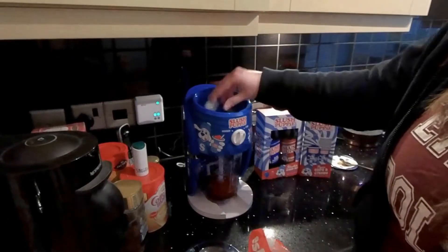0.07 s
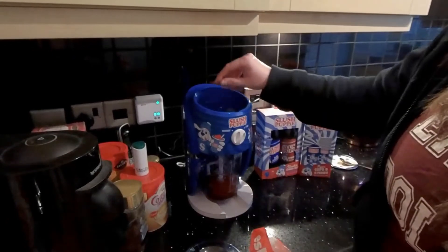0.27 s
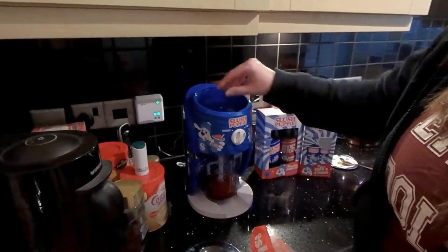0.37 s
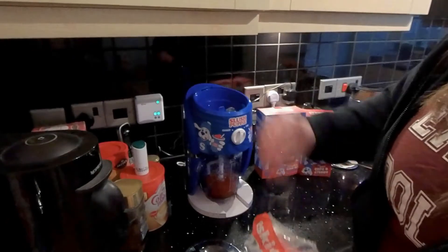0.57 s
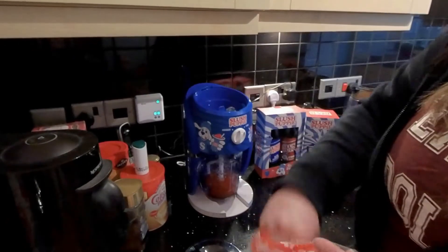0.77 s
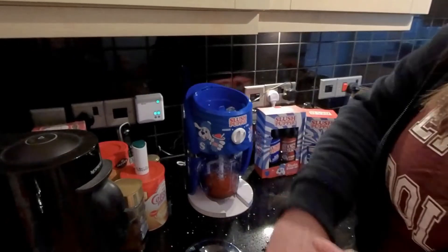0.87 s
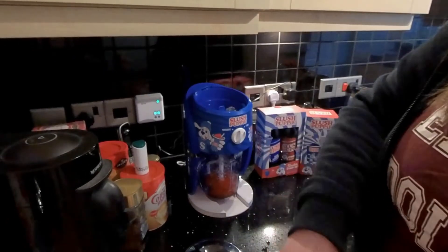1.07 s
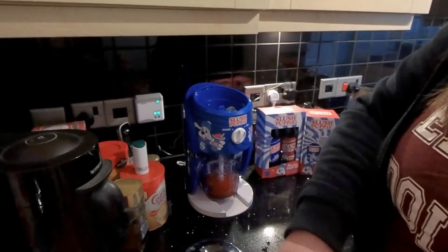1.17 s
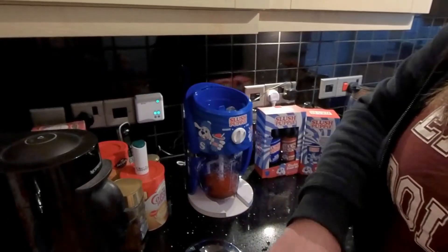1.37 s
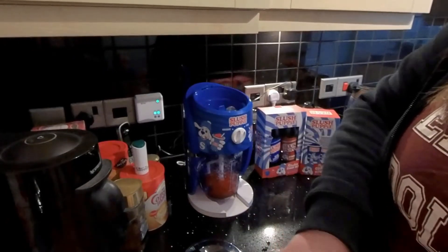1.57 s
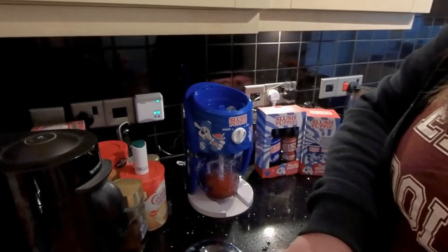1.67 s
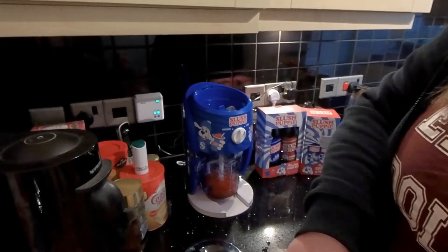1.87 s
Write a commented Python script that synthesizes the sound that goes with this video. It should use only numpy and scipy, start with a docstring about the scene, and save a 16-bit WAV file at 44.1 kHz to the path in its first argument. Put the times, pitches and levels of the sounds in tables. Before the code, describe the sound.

An ice cube drops into a hollow plastic hopper with a loud rattling crack, then after a brief pause a hand rummages in a crackling plastic bag of ice, in a tiled kitchen, stereo microphone nearby.

```python
"""In a tiled kitchen, a microphone pair over a steady noise floor: wet fingers let go of ice in bright ticks.
An ice cube drops into the plastic hopper of an ice shaver: rattling contacts ring its modes and crack.
Two more ticks, then a hand digs in a plastic bag of ice: random grains crackle and rustle, noise bands snap.
The cubes shift and bump the counter, whose low modes ring under soft random pushes; the room answers with
dense, decaying noise."""
import sys
import numpy as np
from scipy import signal
from scipy.fft import rfft, irfft
from scipy.io import wavfile
from scipy.ndimage import uniform_filter1d

SR = 44100
rng = np.random.default_rng(int(sys.argv[2]) if len(sys.argv) > 2 else 0)


def nominal_scale(level):
    """Amplitude ratio for a level in decibels (scalar or array-like)."""
    x = np.asarray(level, float) / 20
    return 10 ** x


def master(y):
    """Save y as 16-bit WAV."""
    cut = np.clip(np.atleast_2d(y).T, -1, 1)
    pcm = np.round(cut * 32767)  # scale
    wavfile.write(sys.argv[1], SR, pcm.astype(np.int16))


N = 83790  # samples

# how hard the bag is handled, relative levels: start_s, crackle_db, rustle_db
HANDLING = [(0.67, -86, -78), (0.704, -61.5, -77), (0.728, -48.5, -85), (0.782, -84.5, -66),
            (0.792, -50.5, -63.5), (0.83, -61, -80), (0.844, -43.5, -48.5), (0.908, -46, -50),
            (0.936, -36.5, -54.5), (0.968, -48.5, -54), (1.016, -34.5, -39.5), (1.032, -40.5, -46),
            (1.23, -43, -52), (1.292, -41, -45.5), (1.358, -49, -64), (1.372, -42, -50.5),
            (1.412, -50, -51), (1.512, -49.5, -56.5), (1.594, -50.5, -50), (1.614, -45, -42.5),
            (1.686, -45, -55), (1.816, -57, -65), (1.864, -39.5, -40), (1.9, -44, -43.5)]
# left over right at the bag: freq_hz, balance_db
BAG_BALANCE = [(60, -3.5), (110, 1), (200, -18.5), (380, -11), (700, -4.5), (1290, -4.0), (2380, -2.5),
               (4400, -0.5), (8120, -1), (15000, -9.5)]
# lag added to the right side at the bag: freq_hz, lag_rad
BAG_LAG = [(0, 0), (340, -0.5), (1120, 0.5), (2240, 0.93), (4130, 2), (4390, 5), (5430, 5), (6370, 8),
           (10600, 7.5), (12100, 8.5), (12500, 5), (14000, 7), (15800, 7.5), (16500, 8.5)]


def rms_one(x):
    """Scales a sound to an rms of 1."""
    return x / np.sqrt(np.mean(x ** 2) + 1e-20)


def at_hz(points, hz):
    """Reads a frequency table along a logarithmic axis."""
    table_hz, value = np.array(points).T
    return np.interp(np.log(np.maximum(hz, 1)), np.log(np.maximum(table_hz, 1e-300)), value)


def band_pass(x, low_hz, high_hz):
    """Keeps one frequency band."""
    return signal.sosfilt(signal.butter(2, [low_hz, high_hz], "band", fs=SR, output="sos"), x)


def colour(x, points, share=1):
    """Causal filter with a share of the given dB curve (minimum phase through the cepstrum)."""
    size = 4096
    curve_db = share * at_hz(points, np.fft.rfftfreq(size, 1 / SR))
    cepstrum = irfft(curve_db * np.log(10) / 20)
    cepstrum[1:size // 2] *= 2
    cepstrum[size // 2 + 1:] = 0
    response = irfft(np.exp(rfft(cepstrum)))
    return signal.fftconvolve(x, response)[:N]


def place(x, balance, lag):
    """Left and right differ in level and phase, as the microphone pair makes them."""
    turn = np.exp(-1j * at_hz(lag, np.fft.rfftfreq(2 * N, 1 / SR)))
    lagged = irfft(rfft(x, 2 * N) * turn)[:N]
    return np.array([colour(x, balance, share=.5), colour(lagged, balance, share=-.5)])


def drift(rate_hz):
    """Random wander of spread 1: noise smoothed by two equal poles at rate_hz."""
    r = np.exp(-2 * np.pi * rate_hz / SR)
    return rms_one(signal.lfilter([1], [1, -2 * r, r * r], rng.standard_normal(2 * N))[N:])


def grains(per_s, spread_db):
    """Random clicks of uneven size and either sign."""
    present = rng.random(N) < per_s / SR
    size = nominal_scale(spread_db * np.minimum(rng.exponential(1, N), 4))
    return present * size * rng.choice([-1, 1], N)


def ring(clicks, hz, t60_s):
    """One mode: a damped resonator driven by the clicks, falling 60 dB in t60_s."""
    r = nominal_scale(-60 / (t60_s * SR))
    w = 2 * np.pi * hz / SR
    return signal.lfilter([0, np.sin(w)], [1, -2 * r * np.cos(w), r * r], clicks + 1e-18)


def burst(start_s, level_db, fall_s):
    """Sudden start, exponential fall with time constant fall_s."""
    t = np.arange(N) / SR - start_s
    return nominal_scale(level_db) * (t >= 0) * np.exp(-np.maximum(t, 0) / fall_s)


def noise_floor():
    """Steady coloured noise, independent on the two sides."""
    # colour of the floor: freq_hz, level_db (per Hz, relative)
    floor_colour = [(18, -64), (30, -31.5), (118, -35.5), (170, 15), (210, -9.5), (259, -13), (336, 2.5),
                    (426, -26), (1190, -27), (3490, -12.5), (4300, -32), (6210, -16), (16000, -38)]
    level_db = -71.5
    noise = rng.standard_normal((2, N))
    return nominal_scale(level_db) * np.array([rms_one(colour(side, floor_colour)) for side in noise])


def ticks():
    """Wet fingers let go of the ice: brief bursts of bright grains."""
    # each tick: start_s, level_db
    tick_times = [(0.1085, -38), (0.1154, -35.5), (0.1195, -66), (0.1368, -69), (0.144, -67.5),
                  (0.6023, -47.5), (0.605, -50)]
    # colour of a tick: freq_hz, level_db (per Hz, relative)
    ice_colour = [(470, -88), (800, -60.5), (1070, -10), (1550, -57), (2130, -20.5), (2470, -42),
                  (2630, -22), (3880, -3.5), (5180, -18), (7260, -5.5), (9220, -12), (11100, -12),
                  (16000, -33.5)]
    fall_s = 0.0029
    touch = sum(burst(start_s, level_db, fall_s) for start_s, level_db in tick_times)
    sound = colour(touch * grains(9000, 1.0), ice_colour)
    return place(sound * touch.max() / np.abs(sound).max(), BAG_BALANCE, BAG_LAG)


def cube():
    """Rattling contacts ring the hopper's modes and give a broad crack."""
    # the cube hits the hopper: start_s, level_db, rattle_s (time constant), treble_db (relative)
    hits = [(0.2284, -11.5, 0.015, -8.5), (.243, -18, 0.0082, -0.5), (0.25, -18, 0.0087, 0),
            (0.27, -21.5, 0.015, 8), (0.281, -21, 0.0047, -3), (0.292, -35.5, 0.0043, 22.5),
            (0.32, -33, .008, -17.5), (0.337, -18.5, 0.012, -6.5), (0.346, -22, 0.0059, -6),
            (.352, -26.5, 0.0057, -8.5), (0.372, -35, 0.005, -8), (0.406, -72, 0.0052, 8.5)]
    # modes of the plastic hopper: freq_hz, level_db (relative), t60_s
    hopper_modes = [(315, -19, 0.3), (452, -28, 0.048), (652, 2.5, 0.14), (820, 0.5, 0.023),
                    (906, -5, 0.14), (1108, 2.5, 0.036), (1119, -8, 0.095), (1180, -11, 0.033),
                    (1360, -17, 0.02), (1508, -10, 0.025), (1998, 1.5, 0.16), (2062, 3, .07),
                    (2260, 1.5, 0.02), (2434, -5.5, 0.096)]
    # colour of the contact: freq_hz, level_db (per Hz, relative)
    crack_colour = [(35, -78.5), (60, -33), (290, -11.5), (586, -22), (644, 4), (1690, 0.5), (2040, -6),
                    (2970, -3.5), (11600, -10), (15400, -29), (16500, -56.5)]
    # left over right at the hopper: freq_hz, balance_db
    hopper_balance = [(60, 0.5), (110, 6.5), (200, -4), (380, -6.5), (700, -9), (1290, -8), (2380, -5.5),
                      (4400, -3.5), (8120, -1.5), (15000, -4.5)]
    # lag added to the right side: freq_hz, lag_rad
    hopper_lag = [(300, 0), (860, 0.03), (2580, 0.87), (4200, 1.58), (7240, 0.85), (14000, .5)]
    rattle_per_s, split_hz = 2800, 2030
    knock_db, crack_db, mode_spread_db = -29.5, -2, 6

    low_env = sum(burst(s, db, rattle_s) for s, db, rattle_s, _ in hits)
    high_env = sum(burst(s, db + treble_db, rattle_s) for s, db, rattle_s, treble_db in hits)
    contacts = grains(rattle_per_s, 2.1)
    for start_s, *_ in hits:
        contacts[int(start_s * SR) + 1] = 1.33  # every hit opens with a contact

    modes = 0
    for hz, level_db, t60_s in hopper_modes:
        # each contact excites each mode by a different amount
        uneven = nominal_scale(level_db + mode_spread_db * rng.standard_normal(N))
        modes = modes + ring(contacts * low_env * uneven, hz, t60_s)

    crack = rms_one(colour(contacts + 0.12 * rng.standard_normal(N), crack_colour))
    low, high = (signal.sosfilt(signal.butter(2, split_hz, kind, fs=SR, output="sos"), crack)
                 for kind in ("low", "high"))
    crack = low * low_env - high * high_env  # opposite signs join the two bands without a notch
    return place(nominal_scale(knock_db) * modes + nominal_scale(crack_db) * crack, hopper_balance, hopper_lag)


def patchy(x, depth_db):
    """Each band swells and sinks on its own; neighbouring bands have opposite signs."""
    edges = np.geomspace(250, 19000, 10)  # Hz
    out = 0
    for k, (low_hz, high_hz) in enumerate(zip(edges, edges[1:])):
        out = out + band_pass(x, low_hz, high_hz) * nominal_scale(depth_db * drift(49)) * (-1) ** k
    return out


def snaps():
    """Single snaps of the film and clicks of cubes: short bursts of grains in a narrow band."""
    # each snap: start_s, level_db (relative peak), centre_hz, fall_s, half_width_oct
    snap_times = [(0.6834, -49.5, 3370, 0.006, 0.46), (0.7105, -41.5, 7360, 0.006, 0.19),
                  (0.732, -57, 3820, 0.006, 0.48), (0.7903, -33.5, 6490, 0.01, 0.56),
                  (0.7925, -48, 5680, 0.006, 0.23), (0.816, -46, 1040, 0.006, 0.17),
                  (0.84, -30.5, 5450, 0.006, 0.26), (0.8544, -39, 1040, 0.007, 0.26),
                  (0.8782, -32, 1086, 0.0042, 0.63), (0.928, -45, 8600, 0.006, 0.56),
                  (0.9927, -23.5, 4260, 0.0033, 0.44), (1.0057, -34, 1083, 0.006, 0.3),
                  (1.0985, -26.5, 10200, 0.006, 0.45), (1.102, -24.5, 7350, 0.006, 0.64),
                  (1.2244, -28, 7500, 0.006, 0.61), (1.2564, -28, 8600, 0.006, 0.5),
                  (1.3654, -30, 7560, 0.009, 0.5), (1.3698, -26, 10150, 0.0069, 0.44),
                  (1.6123, -34, 1088, 0.0027, 0.96), (1.67, -31.5, 2260, 0.0056, 0.42),
                  (1.7416, -34, 2200, 0.0068, 0.71), (1.788, -43.5, 2280, 0.0096, 0.27),
                  (1.829, -34, 8860, 0.0048, 0.44), (1.864, -45, 1900, 0.0043, 0.17)]
    trim_db = -4.5
    source = grains(8000, 1.9)
    out = 0
    for start_s, level_db, hz, fall_s, half_width_oct in snap_times:
        spread = 2 ** half_width_oct
        snap = band_pass(source * burst(start_s, 0, fall_s) + 1e-18, hz / spread, hz * spread)
        out = out + nominal_scale(level_db + trim_db) * snap / np.abs(snap).max()
    return out


def bag():
    """Clumped crackle of the film over a lower rustle, plus single snaps."""
    # colour of the film's crackle: freq_hz, level_db (per Hz, relative)
    film_colour = [(1180, -23), (2000, -2), (4390, 3), (5570, -3.5), (7390, 1.5), (10200, -2.5),
                   (15200, -15.5), (16100, -9), (16500, -41)]
    # colour of the lower rustle: freq_hz, level_db (per Hz, relative)
    rustle_colour = [(240, -29.5), (400, 2), (449, -3.5), (706, 0), (770, 2.5), (1500, -5), (2180, -5),
                     (4000, -8.5), (5200, -30), (8800, -120)]
    crackle_per_s, rustle_per_s = 5300, 2500
    grain_spread_db, clump_db, patch_db, trim_db = 3.5, 1.5, 1.5, -5.0

    start_s, crackle_db, rustle_db = np.transpose(HANDLING)
    t = np.arange(N) / SR
    clumps = clump_db * drift(52)
    out = 0
    for level_db, per_s, spectrum in ((crackle_db, crackle_per_s, film_colour),
                                      (rustle_db, rustle_per_s, rustle_colour)):
        sound = rms_one(colour(grains(per_s, grain_spread_db), spectrum))
        out = out + sound * nominal_scale(np.interp(t, start_s, level_db, left=-120) + trim_db + clumps)
    return place(patchy(out, patch_db) + snaps(), BAG_BALANCE, BAG_LAG)


def bumps():
    """Cubes bump the counter through the bag: soft, rumbling blows into its low modes."""
    # each bump: start_s, level_db (relative), upper_db (added to the upper two modes), balance_db (L-R)
    bump_times = [(0.76, -29, -33, 5), (0.85, -36.5, -0.5, -1.5), (0.993, -39.5, 3, -9),
                  (1.036, -34, -4, 11), (1.107, -30, 2, -3.0), (1.137, -33, 6, -6), (1.17, -36, -9, -12),
                  (1.209, -37, -12, -16), (1.278, -24, -16, 1), (1.309, -33, -20, 6),
                  (1.402, -29.5, -12, -14.5), (1.466, -39, -49, -28), (1.536, -26.5, -14, 3.5),
                  (1.604, -20.5, -13.5, -8.5), (1.639, -32, -28, -15), (1.728, -85, -8, 17),
                  (1.779, -41.5, -41, -9), (1.847, -19.5, -3.5, -7.5), (1.867, -23.5, -31, -21.5),
                  (1.887, -23, -15, 5)]
    # modes of the counter: freq_hz, level_db (relative), t60_s
    counter_modes = [(182, 6.5, 0.108), (224, 4.5, 0.081), (332, 8.5, 0.09), (365, 7, 0.068)]
    soft_hz, trim_db, rumble_s, lead_s = 375, -15.5, 0.0051, 0.006
    shift_db = -4.5  # the shifting bag keeps the counter rumbling, relative to the rustle

    handling_s, _, rustle_db = np.transpose(HANDLING)
    shifting = nominal_scale(np.interp(np.arange(N) / SR, handling_s, rustle_db, left=-120) + shift_db)
    soft = signal.butter(4, soft_hz, fs=SR, output="sos")
    sides = np.array([[.5], [-.5]])
    out = np.zeros((2, N))
    for k, (hz, mode_db, t60_s) in enumerate(counter_modes):
        push = shifting
        for start_s, level_db, upper_db, balance_db in bump_times:
            blow = burst(start_s - lead_s, level_db + upper_db * (k > 1), rumble_s)
            push = push + blow * nominal_scale(balance_db * sides)
        jostle = rng.choice([-1, 1], N) / np.sqrt(rumble_s * SR)
        out += ring(signal.sosfilt(soft, nominal_scale(mode_db + trim_db) * push * jostle), hz, t60_s)
    return out


def kitchen(x):
    """Dense reflections: noise that dies band by band, partly alike on both sides."""
    # decay of the room: freq_hz, t60_s
    room_t60 = [(60, 0.17), (250, 0.14), (700, 0.36), (2000, 0.34), (5000, 0.46), (9000, 0.39),
                (14000, 0.33)]
    # share of the reflections common to both sides: freq_hz, share (0 to 1)
    room_likeness = [(100, .5), (500, 0.57), (2000, .4), (4000, 0.24), (9000, 0.78)]
    delay_s, level_db = 0.0018, -3.5

    t = np.arange(SR // 2 + SR // 4) / SR
    white = rng.standard_normal((2, 3, len(t)))  # neighbouring bands draw on different noise
    edges = 50 * 2 ** np.arange(0, 8.6, .5)  # Hz
    tail = 0
    for k, (low_hz, high_hz) in enumerate(zip(edges, edges[1:])):
        centre_hz = np.sqrt(low_hz * high_hz)
        shared, *own = band_pass(white[k % 2], low_hz, high_hz)
        alike = at_hz(room_likeness, centre_hz)
        mixed = np.sqrt(alike) * shared + np.sqrt(1 - alike) * np.array(own)
        tail = tail + mixed * nominal_scale(-60 * t / at_hz(room_t60, centre_hz))
    tail = tail * (t > delay_s)
    tail = tail / np.sqrt(np.sum(tail ** 2) / 2)
    return nominal_scale(level_db) * signal.fftconvolve(x, tail, axes=1)[:, :N]


def scene():
    """The sources, the kitchen's answer to them and the noise floor."""
    dry = ticks() + cube() + bag() + bumps()
    return dry + kitchen(dry) + noise_floor()


def suppress(x):
    """Noise suppressor: what sinks towards the threshold is turned down further."""
    # threshold: freq_hz, level_db (per bin)
    hush = [(200, -85), (500, -83), (1000, -90), (4000, -85.5), (8000, -84.5), (14000, -83.5)]
    deepest_db = -7
    hz, _, bins = signal.stft(x, SR, nperseg=512)
    power = np.mean(np.abs(bins) ** 2, axis=0)
    power = uniform_filter1d(power, size=3, axis=1)  # over time
    power = uniform_filter1d(power, size=5, axis=0)  # over frequency
    threshold = nominal_scale(at_hz(hush, hz))[:, None]
    gain = np.maximum(1 - threshold / np.sqrt(power + 1e-20), nominal_scale(deepest_db))
    return signal.istft(bins * gain, SR, nperseg=512)[1][:, :N]


def low_pass(x):
    """Removes everything above the highest recorded frequency."""
    return signal.sosfilt(signal.butter(12, 16880, fs=SR, output="sos"), x)


def record(dry):
    """Bass cut of the microphone with a little uncut sound, rounded peaks, noise suppressor."""
    bass_cut_hz, leak_db = 214.6, -26.5
    bass_cut = signal.butter(5, bass_cut_hz, "high", fs=SR, output="sos")
    heard = signal.sosfilt(bass_cut, dry) + nominal_scale(leak_db) * dry
    mix = suppress(np.tanh(heard))
    return low_pass(mix)


dry = scene()
out = record(dry)
master(out)
```